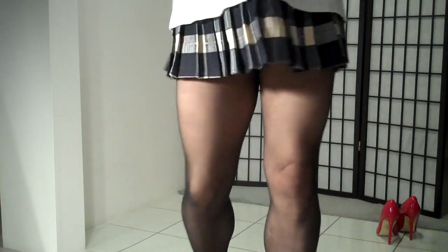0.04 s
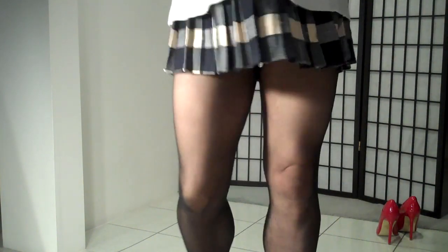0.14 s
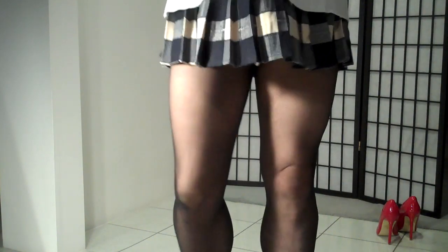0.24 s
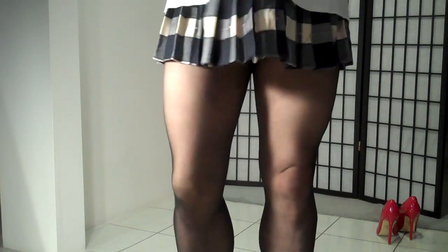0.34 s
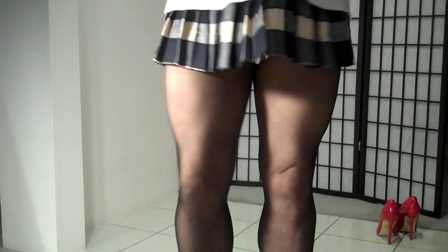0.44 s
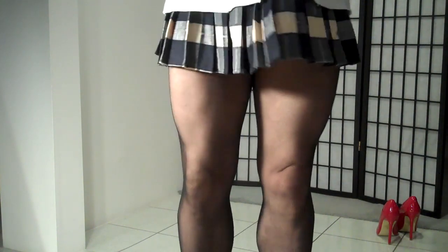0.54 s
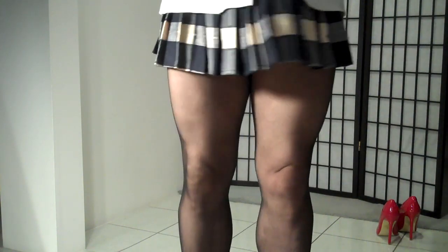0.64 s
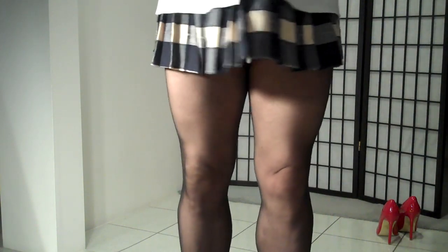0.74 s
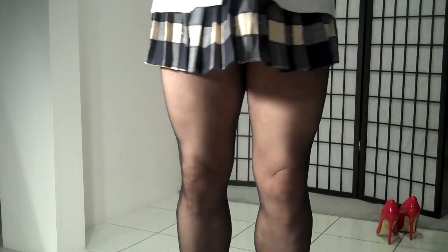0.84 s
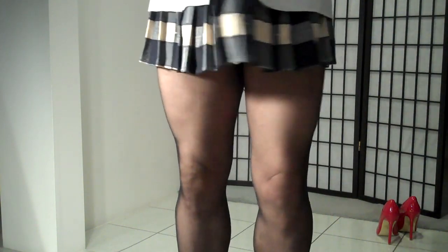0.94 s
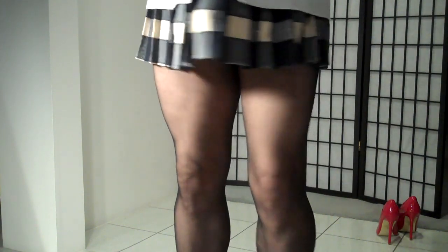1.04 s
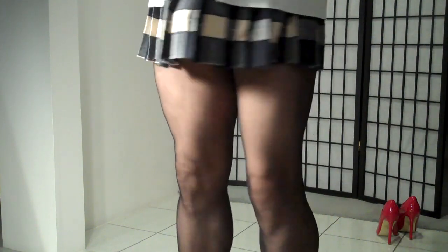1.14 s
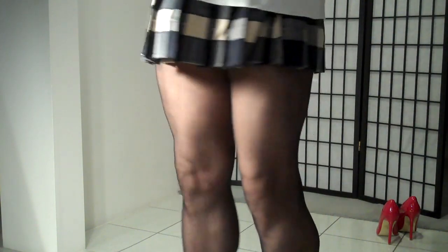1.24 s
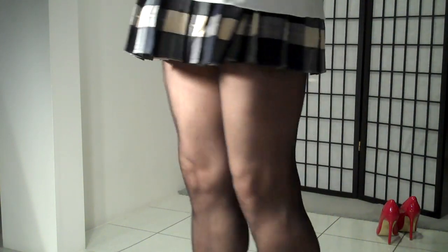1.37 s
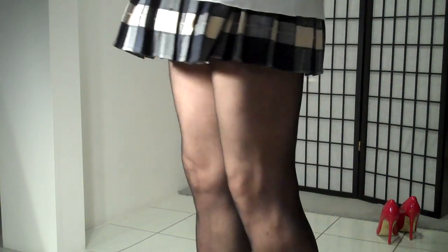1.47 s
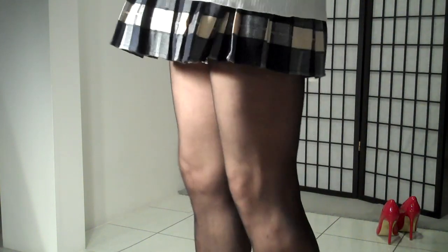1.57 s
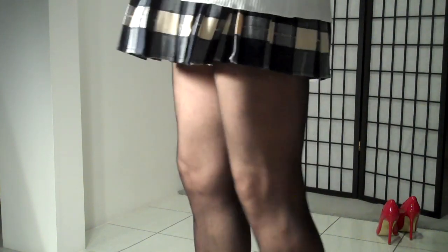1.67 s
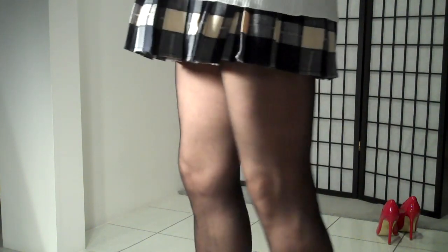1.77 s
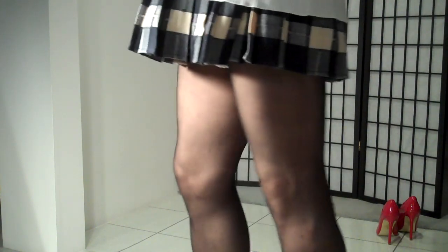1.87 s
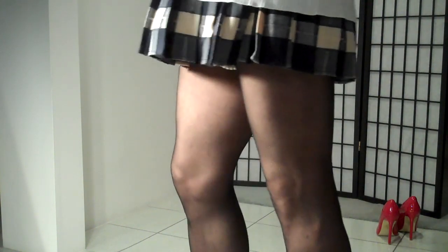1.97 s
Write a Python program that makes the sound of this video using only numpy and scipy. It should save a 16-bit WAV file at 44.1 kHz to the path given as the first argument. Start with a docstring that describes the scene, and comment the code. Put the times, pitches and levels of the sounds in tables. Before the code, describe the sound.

Heeled shoes tapping a tile floor in a small bare room, with stockings and skirt rubbing

```python
"""Someone in high heels shifts weight on a tile floor in a small, bare room.
Two knocks of the shoe come first, each a sum of short decaying modes with a noise scuff. Two sharp clicks
of the heel tip follow at once, as minimum-phase pulses. Stockings and skirt rub, pause and rub again,
as shaped noise, with two more knocks; the rubbing fades and a last, stronger knock falls near the end.
A quiet room hum of steady noise lies underneath; two microphone capsules each ring in the treble."""
import sys
import numpy as np
from scipy import signal
from scipy.fft import rfft, irfft
from scipy.io import wavfile
from scipy.ndimage import uniform_filter1d

SR = 44100
rng = np.random.default_rng(int(sys.argv[2]) if len(sys.argv) > 2 else 0)


def bounce(signal):
    """Save signal as a 16-bit WAV file at the path given by the first command-line argument."""
    frames = np.transpose(np.atleast_2d(signal))
    limited = np.clip(frames, -1, 1)
    pcm = np.round(limited * 32767).astype(np.int16)
    wavfile.write(sys.argv[1], SR, pcm)


N = 88200  # samples


def amp(db):
    """Level law: decibels to amplitude gain."""
    return 10 ** (np.asarray(db) / 20)


def unit(x):
    """Normalization: scales to rms 1."""
    return x / np.sqrt(np.mean(x ** 2) + 1e-20)


def read(points, hz):
    """Spectral interpolation: reads a table on a log-frequency axis."""
    table_hz, value = np.transpose(points)
    return np.interp(np.log(hz + 1), np.log(table_hz + 1), value)


def lean(left_db):
    """Intensity stereo: opposite level offsets place a source off centre."""
    return amp([[left_db], [-left_db]])


def add(mix, start_s, sound):
    """Superposition: adds a sound into the mix at a time."""
    part = mix[round(start_s * SR):][:len(sound)]
    part += sound[:len(part)]


def ring(t, hz, t60, swell):
    """Damped oscillation: a mode swells briefly and dies away exponentially, with envelope gain 1."""
    fade = amp(-60 * t / t60) * (1 - np.exp(-t / swell))
    return 2 * fade / fade.sum() * np.sin(2 * np.pi * hz * t)


def pulse(colour_db, size=4096):
    """Minimum phase: the Hilbert transform of the log spectrum gives the most compact causal pulse."""
    level_db = colour_db(np.fft.rfftfreq(size, 1 / SR))
    half = np.log(amp(np.maximum(level_db, -100)))
    full = np.concatenate([half, half[-2:0:-1]])
    spectrum = np.exp(np.conj(signal.hilbert(full)))
    return np.fft.ifft(spectrum).real


def correlate(left, other, same):
    """Partial coherence: mixes two independent fields into a stereo pair of given left-right likeness."""
    same = np.clip(same, -1, 1)
    return np.array([left, same * left + np.sqrt(1 - same ** 2) * other])


def noise(field_db, likeness, size):
    """Short-time synthesis: random Fourier cells are weighted in time and frequency, then set to rms 1."""
    hop = size // 4
    t = np.arange(N // hop + 5)[:, None] * hop / SR
    hz = np.fft.rfftfreq(size, 1 / SR)
    a, b, c, d = np.moveaxis(rng.standard_normal((len(t), len(hz), 4)), -1, 0)
    cells = correlate(a + 1j * b, c + 1j * d, likeness(hz)) * amp(field_db(t, hz))
    stereo = signal.istft(cells.transpose(0, 2, 1), nperseg=size, noverlap=size - hop)[1]
    return unit(stereo[:, :N])


# blows of the shoe; the point of contact sets how hard each mode rings:
# (time [s], level sent to the room re direct [dB], pitch factor of the low modes [ratio],
#  then nine mode levels from low to high [dB])
BLOWS = [(0.125, 2, 0.79, -21.5, -8, -18, -10, -11, -22, -14, -21, -25),
         (0.2136, -1, 1.04, -4.5, 6, 3.5, 0.5, -7.5, -1.5, -9.5, -19.5, -23.5),
         (0.5006, 0, 1.065, -9.5, 8.5, -1.5, -8, -6, -36, -24, -33, -36.5),
         (0.7965, 1, 1.0, -31, -24, -13.5, -13.5, -17.5, -44, -26, -33, -42),
         (1.6858, 0.5, 1.02, 1.5, 17.5, 10, 3.5, 5, -6.5, -3, -16, -18)]
# modes of the shoe on the tile, the lowest being the dull push of the foot:
# (frequency before the pitch factor [Hz], t60 [s], swell time constant [s], polarity [sign])
SHOE_MODES = [(191, 0.0073, 0.0016, -1), (600, 0.016, 0.0046, -1), (847.6, 0.012, 0.0019, -1),
              (1016, .011, 0.0028, -1), (1303, 0.0088, 0.003, -1), (2020, 0.0099, 0.00072, -1),
              (2560, 0.008, 0.00074, -1), (3590, 0.0032, 0.00048, 1), (6240, 0.0063, .0001, 1)]
LOW_MODES_HZ = 700  # modes below this shift with the load on the shoe
# passband of the scuff: (lower edge [Hz], upper edge [Hz])
SCUFF_BAND = [430, 4300]
SCUFF_DB, SCUFF_T60_S = -5.5, 0.014  # level is relative to the highest mode's level
BASS_CUT_HZ, KNOCK_LEFT_DB = 169, -0.5


def scuff(t):
    """Friction noise: a band of noise decays exponentially, with energy 1."""
    band = signal.butter(2, np.clip(SCUFF_BAND, 1, SR / 2 - 1), "band", fs=SR)
    grit = signal.lfilter(*band, rng.standard_normal(len(t))) * amp(-60 * t / SCUFF_T60_S)
    return grit / np.linalg.norm(grit)


def knocks(size=4096):
    """Modal excitation: each blow rings the shoe's modes and scuffs the tile; gives direct and room feeds."""
    t = np.arange(size) / SR
    direct, sent = np.zeros(N), np.zeros(N)
    bass_cut = signal.butter(2, BASS_CUT_HZ, "high", fs=SR)
    for start_s, room_db, pitch, *modes_db in BLOWS:
        knock = amp(modes_db[-1] + SCUFF_DB) * scuff(t)
        for db, (hz, t60, swell, polarity) in zip(modes_db, SHOE_MODES):
            mode_hz = hz * pitch if hz < LOW_MODES_HZ else hz
            knock += np.sign(polarity) * amp(db) * ring(t, mode_hz, t60, swell)
        knock = signal.lfilter(*bass_cut, knock)
        add(direct, start_s, knock)
        add(sent, start_s, amp(room_db) * knock)
    return direct * lean(KNOCK_LEFT_DB), sent * lean(KNOCK_LEFT_DB)


# sharp clicks of the heel tip: (time [s], gain on the click spectrum [dB])
HEEL_CLICKS = [(0.2668, -13.5), (0.2773, -4)]
# click spectrum: (frequency [Hz], relative level [dB])
CLICK_SPECTRUM = [(100, -32), (1000, -19.5), (2900, -11), (3900, -5.5), (5000, -7.5), (6200, 2), (7500, 2),
                  (9000, -10), (14000, -23)]
CLICK_LEFT_DB = 0.5


def clicks():
    """Impulsive contact: the hard heel tip snaps on the tile, too briefly to ring the shoe."""
    out = np.zeros(N)
    snap = pulse(lambda hz: read(CLICK_SPECTRUM, hz))
    for start_s, db in HEEL_CLICKS:
        add(out, start_s, amp(db) * snap)
    return out * lean(CLICK_LEFT_DB)


# strokes of the cloth: (time [s], level before the RUB_DB trim [dB])
RUB_LEVEL = [(0, -71), (.27, -63.5), (.33, -57.5), (0.393, -54.5), (.42, -72), (.48, -78), (.55, -60.5),
             (.62, -63.5), (0.692, -53), (.78, -65.5), (.86, -55.5), (.93, -56.5), (.99, -60), (1.05, -55),
             (1.2, -55.5), (1.32, -57), (1.42, -72), (2, -73)]
# spectrum of the rubbing before its tilt: (frequency [Hz], relative level [dB])
RUB_SPECTRUM = [(100, -42), (400, 14), (900, 21.5), (2500, 13), (4500, 6), (7000, -0.5), (9500, -11),
                (14000, -14.5)]
# brightness of the rubbing: (time [s], slope about the pivot [dB per octave])
RUB_SLOPE = [(.38, 14), (.7, 9), (.9, 7.5), (1.25, 7)]
RUB_DB, RUB_LEFT_DB, TILT_PIVOT_HZ = -3, -0.06, 4300
RUB_SAME = 0.36  # left-right likeness
RUB_PATCH_DB, RUB_FLICKER_DB = 0.9, 0.4  # rms unevenness by patch and over all frequencies


def cloth():
    """Sliding friction: stockings and skirt give uneven broadband noise, bright at first and then fuller."""
    def field_db(t, hz):
        patches = uniform_filter1d(rng.standard_normal((len(t), len(hz))), size=14, axis=0)
        patches = unit(uniform_filter1d(patches, size=6, axis=1))
        flicker = unit(uniform_filter1d(rng.standard_normal(t.shape), size=4, axis=0))
        octaves = np.minimum(np.log2((hz + 1) / TILT_PIVOT_HZ), 1)  # slope stops an octave above the pivot
        tilt_db = np.interp(t, *np.transpose(RUB_SLOPE)) * octaves
        uneven_db = RUB_PATCH_DB * patches + RUB_FLICKER_DB * flicker
        return read(RUB_SPECTRUM, hz) + tilt_db + uneven_db

    rubbing = noise(field_db, lambda hz: RUB_SAME, size=256)
    level_db = np.interp(np.arange(N) / SR, *np.transpose(RUB_LEVEL)) + RUB_DB
    return rubbing * amp(level_db) * lean(RUB_LEFT_DB)


# early reflections: (delay [s], left level [dB], right level [dB])
REFLECTIONS = [(.0019, -18.5, -20.5), (.0041, -19.5, -12), (.0079, -11.5, -26), (.0135, -17, -12),
               (.0151, -13, -21.5), (.0168, -14.5, -28), (.0218, -19.5, -15)]
# dense tail: (frequency [Hz], t60 [s], relative level [dB], left-right likeness [ratio])
TAIL = [(68, 0.39, -20, 0.48), (143, 0.62, 2, 0.86), (292, 0.37, 10, 1), (600, .33, -3, 0.87),
        (1210, .37, 5, 0.86), (1540, 0.3, 2.5, .6), (2000, 0.3, 3, 0.53), (2620, 0.32, -0.5, 0.18),
        (3800, 0.32, 3.5, 0.11), (7300, 0.34, -5.5, 0.074), (14000, 0.36, -6.5, 0.084)]
# standing waves, before their stereo lean: (frequency [Hz], level [dB], t60 [s])
STANDING_WAVES = [(120.7, 9.5, 0.11), (140, 15, 0.12), (190.7, 7, 0.2)]
TAIL_GAP_S, TAIL_BUILD_S = 0.0034, 0.0031
STANDING_SWELL_S, BOOM_LEFT_DB = 0.023, -0.8


def room(x, size=26000):
    """Room response: convolution adds distinct reflections, a dense tail and booming standing waves."""
    t = np.arange(size) / SR
    hz, when, cells = signal.stft(rng.choice([-1., 1.], (2, size)), SR, nperseg=512)
    table = np.array(TAIL)
    t60, tail_db, same = (read(np.column_stack([table[:, 0], column]), hz)[:, None]
                          for column in table.T[1:])
    cells = correlate(cells[0], cells[1], same)
    equal_energy = np.sqrt(2 * np.log(1000) / (t60 * SR))  # makes tail energy independent of t60
    cells = cells * amp(tail_db - 60 * when / t60) * equal_energy
    onset = np.clip((t - TAIL_GAP_S) / TAIL_BUILD_S, 0, 1)
    response = signal.istft(cells, SR)[1][:, :size] * onset
    for mode_hz, db, ring_s in STANDING_WAVES:
        response += amp(db) * lean(BOOM_LEFT_DB) * ring(t, mode_hz, ring_s, STANDING_SWELL_S)
    for delay_s, left_db, right_db in REFLECTIONS:
        response[:, round(delay_s * SR)] += amp([left_db, right_db])
    return signal.fftconvolve(x, response, axes=1)[:, :N]


# capsule resonances, left then right: (frequency [Hz], peak gain [dB], quality factor [Q])
CAPSULE_PEAKS = [(7255, 15, 7.5), (6020, 13, 11.5)]


def capsule(x, hz, db, q):
    """Resonance: a microphone capsule lifts one treble peak."""
    peak = signal.lfilter(*signal.iirpeak(hz, q, fs=SR), x)
    return x + (amp(db) - 1) * peak


# background spectrum: (frequency [Hz], relative spectral density [dB])
AIR_SPECTRUM = [(20, -15), (60, -8), (120, -13.5), (180, -10.5), (226, 0.5), (275, -4), (330, -10),
                (420, -9), (800, -11.5), (2000, -13), (4500, -15.5), (6500, -12.5), (8500, -18.5),
                (14000, -20.5)]
# background coherence: (frequency [Hz], left-right likeness [ratio])
AIR_LIKENESS = [(30, 0.13), (100, 0.8), (400, 0.48), (1200, 0.17), (4000, 0.05), (14000, 0.029)]
# background balance: (frequency [Hz], gain on the left and cut on the right [dB])
AIR_BALANCE = [(200, -0.6), (700, 3.5), (3000, 1.9), (6000, -1), (7300, 3), (12000, 0.4)]
AIR_DB = -60  # rms before the balance


def air():
    """Stationary noise: a steady low hum of the room with a faint hiss, partly coherent left to right."""
    bed = noise(lambda t, hz: read(AIR_SPECTRUM, hz), lambda hz: read(AIR_LIKENESS, hz), size=2048)
    left_db = read(AIR_BALANCE, np.fft.rfftfreq(N, 1 / SR))
    return amp(AIR_DB) * irfft(rfft(bed) * amp([left_db, -left_db]), N)


def scene():
    """Superposition: shoes and cloth pass through the two capsules and add to the background."""
    knock, knock_sent = knocks()
    click = clicks()
    moving = knock + click + room(knock_sent + click) + cloth()
    picked_up = np.array([capsule(side, *peak) for side, peak in zip(moving, CAPSULE_PEAKS)])
    return picked_up + air()


EDGE_HZ = 14450


def record(dry):
    """Band limitation: a linear-phase low-pass filter removes the highest treble."""
    low_pass = signal.firwin(511, EDGE_HZ, window=("kaiser", 8), fs=SR)
    return signal.oaconvolve(dry, low_pass[None], "same")


dry = scene()
out = record(dry)
bounce(out)
```